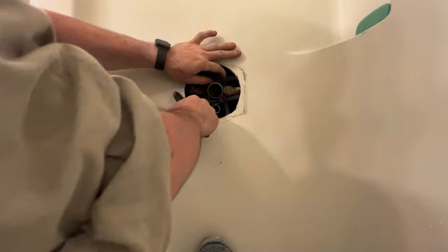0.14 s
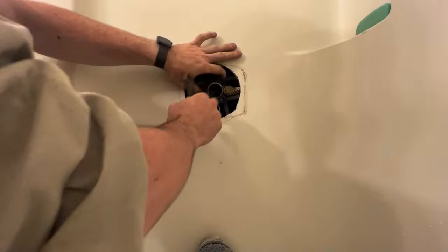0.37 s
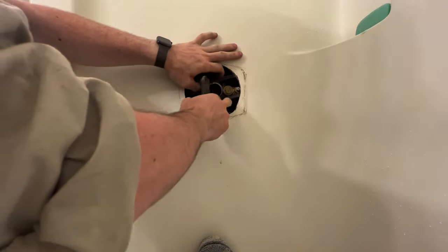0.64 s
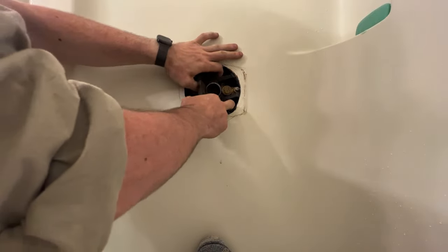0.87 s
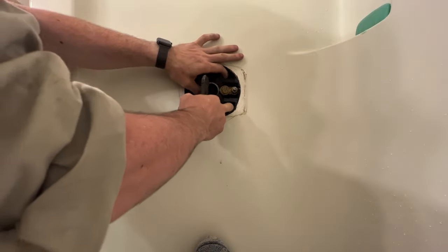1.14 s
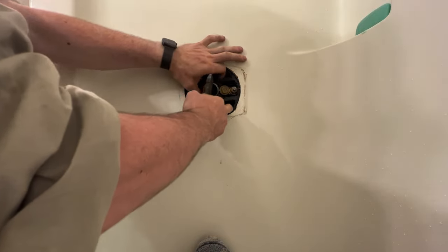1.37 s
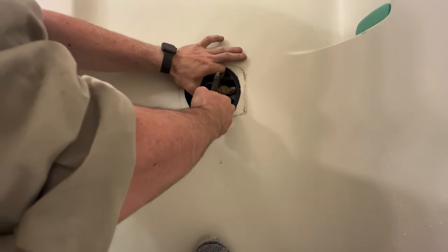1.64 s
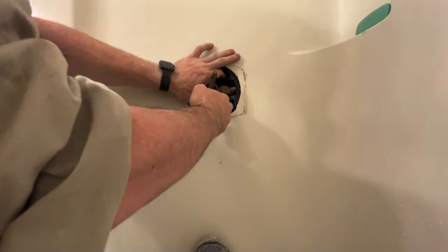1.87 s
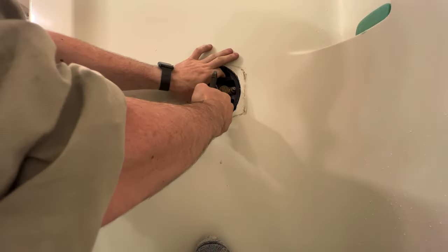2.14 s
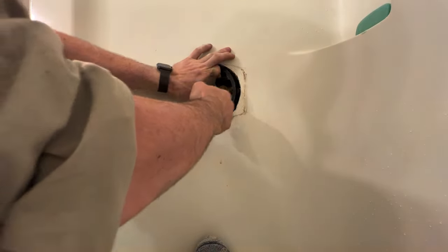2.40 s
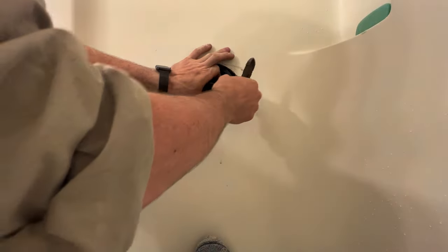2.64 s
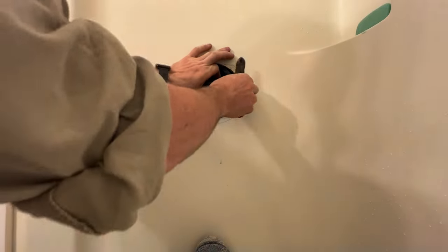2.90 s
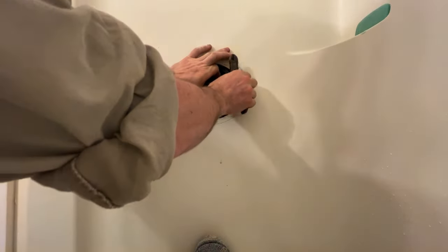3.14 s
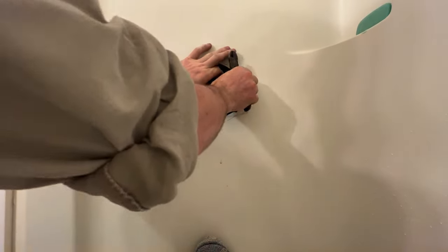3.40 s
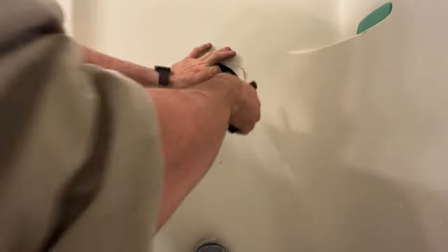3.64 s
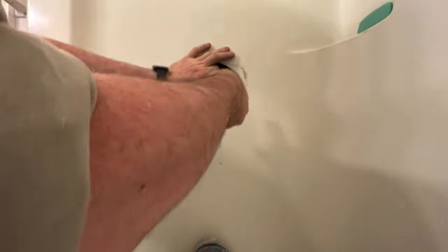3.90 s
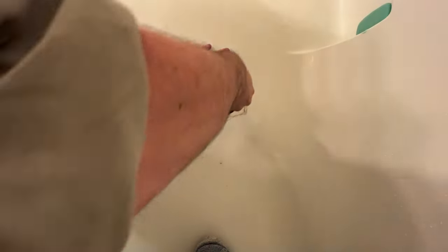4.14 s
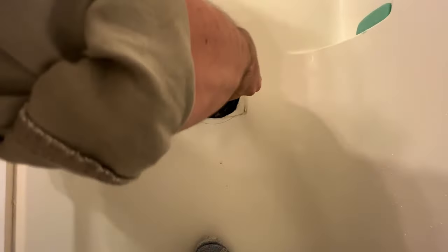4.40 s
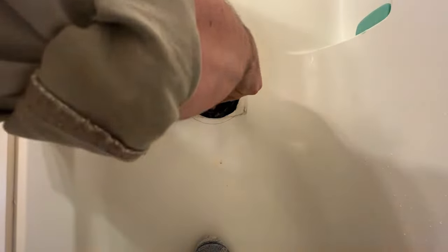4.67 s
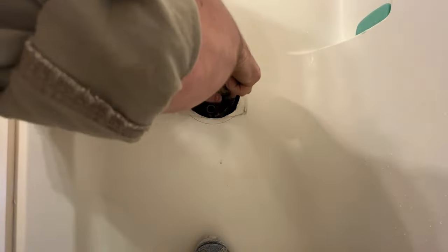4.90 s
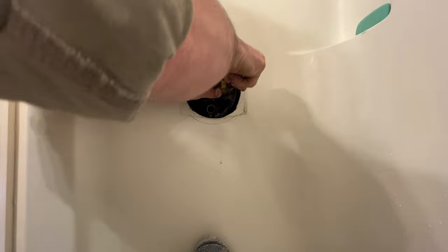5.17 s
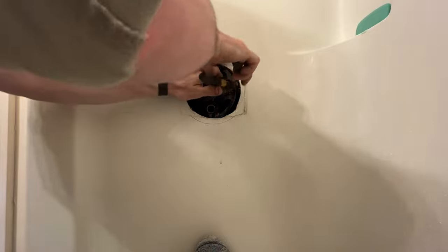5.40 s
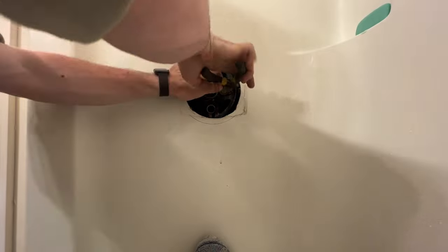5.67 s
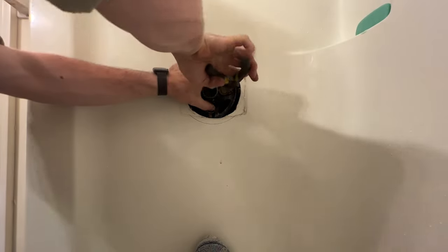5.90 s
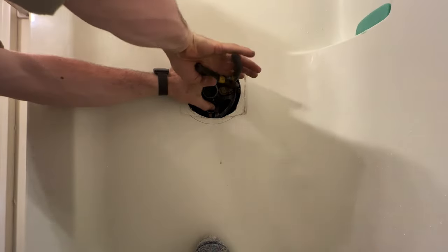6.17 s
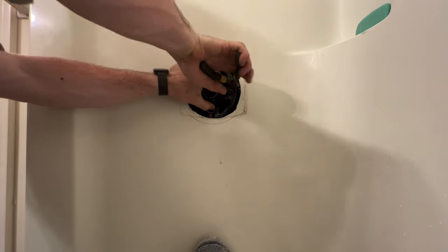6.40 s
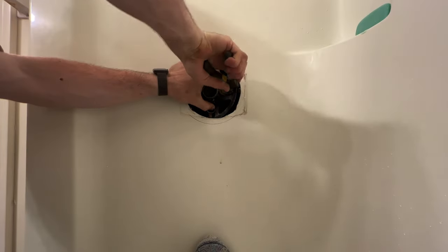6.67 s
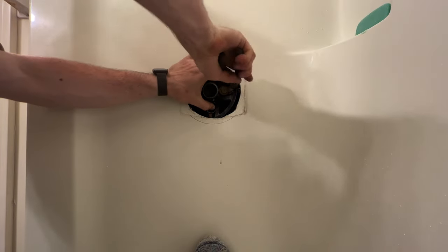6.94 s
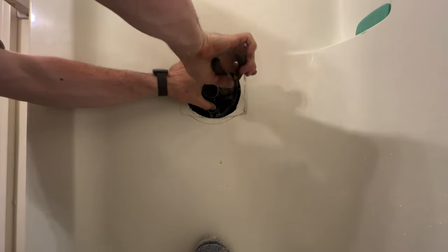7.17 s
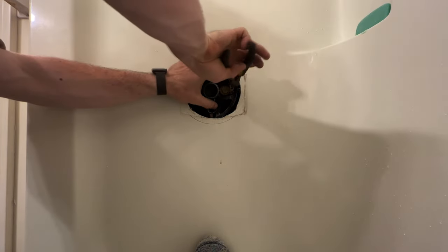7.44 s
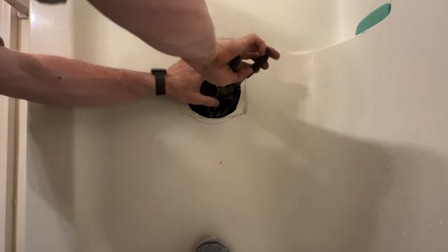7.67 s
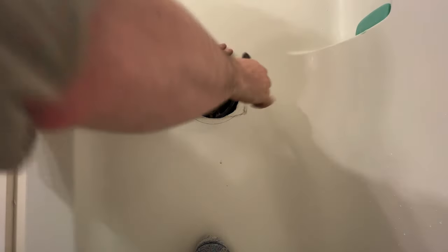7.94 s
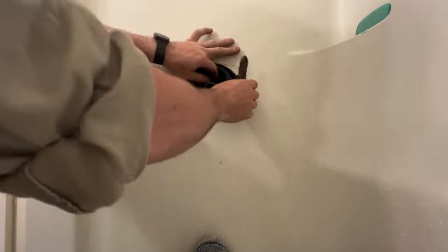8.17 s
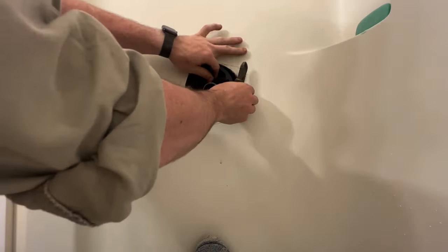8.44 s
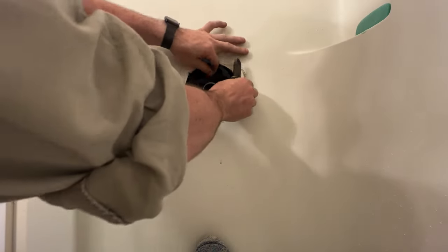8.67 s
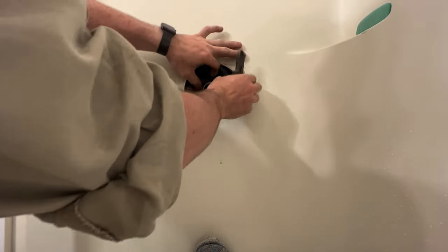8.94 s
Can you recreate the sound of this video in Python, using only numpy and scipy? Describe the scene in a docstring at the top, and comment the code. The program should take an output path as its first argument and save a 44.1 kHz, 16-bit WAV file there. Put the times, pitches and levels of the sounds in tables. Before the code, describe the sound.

Close-up in a small, hard bathroom, hands and pliers work at a valve in a hollow plastic shower surround. From 0 to 1.5 s irregular dull knocks and rubbing come thick and fast, growing denser after 0.85 s, with very faint metal scraping and small clicks. A heavy hollow thud lands at 1.7 s, then a tight burst at 2.3 s, boomy with a sharp metallic crack. From 2.8 to 4.3 s only soft taps and rubbing; muted bumps follow at 4.4, 4.6, 5.1 and 5.2 s, then near quiet. At 6.8 s comes the loudest blow, a hard double clack of steel and plastic with a short bright ring and boomy tail. A light knock at 7.2 s, a tiny wet squeak at 7.8 s, soft bumps, then medium knocks with faint clicks at 8.6 and 8.9 s. Low wall rumble swells irregularly beneath faint hiss and buzz.

```python
"""Pliers work on a valve set in the wall of a plastic shower surround, heard by a phone close by.
Knocks and rubbing ring the modes of the hollow shell and its dense boom; steel parts click and scrape
as noise bursts, short modes and wavering squeals, and the small hard room answers with decaying noise.
Under it the wall rumbles in low noise as the worker leans on it, and the microphone hisses and buzzes.
Late on, a finger squeaks on the wet plastic: noise ringing in a few panel modes."""
import sys
import numpy as np
from scipy import signal
from scipy.fft import rfft, irfft
from scipy.io import wavfile
from scipy.ndimage import uniform_filter1d

SR = 44100
rng = np.random.default_rng(int(sys.argv[2]) if len(sys.argv) > 2 else 0)


def transcribe(u):
    """Save the signal u as a 16-bit wav file named by the first command-line argument.

    u: samples, shape (n,) or (channels, n), limited to [-1, 1]; the rate is SR.
    q: integer samples, one column per channel.
    """
    v = np.clip(np.atleast_2d(u).T, -1, 1)
    q = np.round(v * 32767).astype(np.int16)
    wavfile.write(sys.argv[1], SR, q)


def natural_amplitude(level_db):
    """Convert a level in decibels to a linear amplitude factor, elementwise."""
    exponent = np.asarray(level_db, float) / 20
    return 10 ** exponent


N = 399546  # samples


def on_log(hz, table):
    """Read (Hz, value) rows on a log-frequency axis."""
    table_hz, value = np.transpose(table)
    return np.interp(np.log(np.maximum(hz, 1)), np.log(table_hz), value)


def unit(x):
    """Scale to rms 1."""
    return x / np.sqrt(np.mean(x ** 2))


def band(x, low_hz, high_hz):
    """Band-pass."""
    edges_hz = [low_hz, min(high_hz, 0.45 * SR)]
    return signal.sosfilt(signal.butter(2, edges_hz, "band", fs=SR, output="sos"), x)


def train(s, size):
    """Impulses of given size at given times."""
    x = np.zeros(N)
    at = np.clip((np.asarray(s) * SR).astype(int), 0, N - 1)
    np.add.at(x, at, size)
    return x


def fall(x, t60):
    """Each impulse becomes an exponential decay, down to a thousandth after t60 seconds."""
    return signal.lfilter([1], [1, -np.exp(-np.log(1000) / (t60 * SR))], x)


def ring(x, hz, t60):
    """One decaying mode; an impulse of 1 rings with amplitude 1."""
    radius = np.exp(-np.log(1000) / (t60 * SR))
    angle = 2 * np.pi * hz / SR
    return signal.lfilter([0, radius * np.sin(angle)], [1, -2 * radius * np.cos(angle), radius ** 2], x)


# How the small hard room and the shell die away at the microphone.
# Each row: pitch in Hz, decay time t60 in seconds.
RING_DOWN = [(40, 0.99), (110, 0.43), (280, 0.33), (740, 0.23), (1300, .21), (2200, 0.28), (5120, 0.22),
             (9000, .19), (14500, 0.15)]


def diffuse(power, hz, build_s):
    """Countless overlapping echoes in a third octave: they build up, then die at that band's rate."""
    # energy falls twice as fast as amplitude, hence half the t60
    energy = fall(power, on_log(hz, RING_DOWN) / 2) - fall(power, build_s)
    level = np.sqrt(np.maximum(energy, 0) * SR / hz)
    return band(level * rng.standard_normal(N), hz / 2 ** (1 / 6), hz * 2 ** (1 / 6))


def chatter(rate, spread_db, bump_db):
    """Stick-slip: random slips, rate per second, of unequal size that bunch into bumps; rms 1."""
    slips = (rng.random(N) < rate / SR) * natural_amplitude(spread_db * rng.exponential(size=N))
    bumps = natural_amplitude(bump_db * unit(band(rng.standard_normal(N), 7.04, 28)))
    return unit(slips * bumps * rng.standard_normal(N))


def strokes(s, length_s, attack_s, t60):
    """One envelope a row: swell, hold, exponential release."""
    since = np.arange(N) / SR - s[:, None]
    released = np.maximum(since - length_s[:, None], 0)
    return np.clip(since / attack_s, 0, 1) ** 2 * np.exp(-np.log(1000) * released / t60)


def after_blows(t60):
    """A level that jumps with every knock and dies away."""
    s, db = np.transpose(KNOCKS)[:2]
    return fall(train(s, natural_amplitude(db)), t60)


# The noise floor at the microphone, as a spectrum shape.
# Each row: pitch in Hz, relative level in dB per Hz.
HISS = [(26, -37), (45, 7), (73, -8), (103, -20.5), (195, -19.5), (437, -28), (712, -30.5), (932, -38),
        (1640, -44), (3490, -43.5), (9050, -46.5), (15500, -43.5)]
HISS_DB = -86  # rms of the hiss between 4.5 and 14 kHz


def hiss():
    """Steady air and microphone noise, with a faint electrical buzz: band-passed pulses at 240 Hz."""
    shape = natural_amplitude(on_log(np.fft.rfftfreq(N, 1 / SR), HISS))
    noise = irfft(rfft(rng.standard_normal(N)) * shape, N)
    noise = noise / np.std(band(noise, 4500, 14000))
    pulses = train(np.arange(0, N / SR, 1 / 240), 1.0)
    buzz = unit(band(pulses, 2300, 15000))
    return natural_amplitude(HISS_DB) * (noise + natural_amplitude(-1.5) * buzz)


# Weight leaning on the wall, between rows the level in dB moves in a straight line.
# Each row: time in seconds, level in dB.
LEAN = [(0.0, -59), (1.19, -44.5), (1.46, -59), (1.97, -37.5), (2.17, -60), (2.4, -34.5), (2.87, -63),
        (3.08, -44), (3.53, -47), (4.36, -64), (4.46, -44), (5.17, -55.5), (5.25, -45.5), (6.23, -58.5),
        (6.97, -41), (7.85, -57.5), (8.55, -47.5), (9.06, -61)]
SHAKE_DB, SHAKE_T60_S = -30.5, 0.41  # a blow shakes the wall too, relative to its own level


def rumble():
    """The wall flexes slowly under the leaning hand and shakes after blows: noise at 10 to 27 Hz."""
    low = unit(band(band(rng.standard_normal(N), 10, 27), 10, 27))
    lean_s, lean_db = np.transpose(LEAN)
    lean = natural_amplitude(np.interp(np.arange(N) / SR, lean_s, lean_db))
    shake = natural_amplitude(SHAKE_DB) * uniform_filter1d(after_blows(SHAKE_T60_S), size=800)
    return (lean + shake) * low


# Hands and tool rubbing the panel.
# Each row: start in seconds, length in seconds, pressure in dB, rasp in dB over pressure
# before RUB_LIFT_DB, thud in dB over pressure.
STROKES = [(0.077, 0.13, -54, -18, -4), (0.235, 0.13, -43, -14, -9), (0.58, 0.55, -54, -14, 5),
           (0.88, 0.067, -33, -20, -6), (1.05, 0.16, -39.5, -36, -11), (1.166, 0.073, -34.5, -22, -1),
           (1.387, 0.1, -48.5, -22, 5.5), (1.595, 0.21, -50.5, -23, 10.5), (2.507, 0.041, -75, -3.5, 6.5),
           (2.809, 0.23, -65, -24.5, 4), (2.978, 0.23, -62, -8, -4), (3.276, 0.24, -57.5, -5, 5.5),
           (4.068, 0.53, -67, -7, -21.5), (4.484, 0.2, -74.5, -5, -7), (5.044, 0.077, -66, -18.5, 17),
           (5.501, 0.15, -76.5, -14, 18), (6.109, 0.25, -64, -11.5, 0), (6.373, 0.19, -68.5, -3.5, -0.5),
           (7.163, 0.067, -50.5, -26, 4), (7.394, 0.25, -65.5, -15, 11), (7.707, 0.077, -47, -17, -1),
           (7.917, 0.091, -56.5, -21, 9), (8.05, 0.17, -53.5, -18.5, -8), (8.324, 0.17, -52, -18, -5),
           (8.475, 0.2, -60, -3, -13), (8.71, 0.17, -50, -18, 1), (8.939, 0.054, -36, -36, -43)]
STROKE_ATTACK_S, STROKE_T60_S = 0.035, 0.3
# the hand lying still: pressure, then rasp (before RUB_LIFT_DB) and thud over it
REST_DB, REST_RASP_DB, REST_THUD_DB = -77, -6.5, 3.5
# loose parts after a blow: amplitude relative to the blow, then each part's gain on it
RATTLE_DB, RATTLE_RASP_DB, RATTLE_THUD_DB, RATTLE_T60_S = -34, -6, 4.5, 0.54


def hands():
    """Thud, pressure and rasp in dB: strokes, the resting hand and the rattle after blows."""
    s, length_s, db, rasp_db, thud_db = np.transpose(STROKES)
    shape = strokes(s, length_s, STROKE_ATTACK_S, STROKE_T60_S)
    rattle = natural_amplitude(RATTLE_DB) * after_blows(RATTLE_T60_S)

    def total_db(over_db, rest_over_db, rattle_over_db):
        """Sum the three motions for one part of the rubbing."""
        rubbing = natural_amplitude(db + over_db) @ shape
        resting = natural_amplitude(REST_DB + rest_over_db)
        return 20 * np.log10(rubbing + resting + natural_amplitude(rattle_over_db) * rattle)

    thud = total_db(thud_db, REST_THUD_DB, RATTLE_THUD_DB)
    pressure = total_db(0, 0, 0)
    rasp = total_db(rasp_db, REST_RASP_DB, RATTLE_RASP_DB)
    return thud, pressure, rasp


# Knocks on the shell, close to the microphone.
# Each row: start in seconds, level in dB, bass in dB over level, upper range in dB over level
# before BLOW_LIFT_DB, strongest pitch in Hz.
KNOCKS = [(0.002, -31.5, 2, -17, 212), (0.184, -53, 15.5, -14, 257), (0.398, -39.5, -1, -29, 510),
          (0.425, -32, -8, -19, 277), (0.489, -49.5, 13.5, -9.5, 304), (0.678, -43, 5, -28, 272),
          (0.861, -34.5, -2, -14.5, 480), (0.931, -41, -1, -18, 398), (0.961, -36, 9, -15.5, 1220),
          (1.025, -30, -6.5, -19.5, 530), (1.068, -24.5, -8.5, -28.5, 116), (1.154, -31.5, -4, -25, 286),
          (1.206, -31, 3.5, -19, 308), (1.233, -28, -4.5, -19, 547), (1.38, -25.5, -2, -23, 136),
          (1.419, -29, -1.5, -21.5, 365), (1.454, -34.5, -1, -15, 410), (1.467, -24, -12.5, -22, 624),
          (1.7005, -14.5, -8, -15.5, 301), (2.2798, -34, 5, -15.5, 470), (2.313, -22, -11.5, -14, 504),
          (2.317, -22, -4, -13, 625), (2.3297, -12.5, -2.5, -9.5, 299), (2.35, -24.5, -3.5, -12, 164),
          (2.378, -24.5, -12, -12.5, 605), (2.789, -53.5, -5.5, -24, 266), (2.838, -49.5, -1, -13, 265),
          (2.992, -39.5, -12.5, -12, 492), (3.086, -47, -2.5, -49, 273), (3.309, -53, 5, -10, 273),
          (3.408, -52.5, -11, -8, 350), (3.55, -44.5, -15.5, -32, 435), (4.409, -36.5, 3.5, -14, 260),
          (4.474, -53.5, 10, -18, 200), (4.64, -40, 6.5, -13.5, 262), (4.704, -56, 9, -14, 218),
          (4.89, -55.5, 16, -15.5, 790), (5.085, -45, -37, -21, 281), (5.096, -28, -15, -19, 235),
          (5.18, -34, -6.5, -28, 237), (5.548, -50.5, -8.5, -28, 266), (5.861, -71.5, -16, -4.5, 1200),
          (6.416, -55, 13, -27, 238), (6.432, -67, -0.5, -1.5, 597), (6.56, -54.5, -27.5, -7, 244),
          (6.762, -62.5, 7.5, -4, 503), (6.813, -18.5, 1, -12.5, 187), (6.8465, -11, -7, -7.5, 464),
          (6.857, -15.5, -3, -29, 158.3), (7.175, -52, 21.5, -16, 130), (7.19, -34.5, -14.5, -21.5, 714),
          (7.895, -37.5, 6, -14, 294), (7.915, -35, -13, -19, 1670), (8.116, -38, 4.5, -10, 313),
          (8.276, -48.5, 3, -51, 270), (8.332, -53, -5, -10, 960), (8.602, -31.5, 5.5, -12, 685),
          (8.622, -41.5, -3, -8.5, 503), (8.652, -25.5, -2.5, -10, 198), (8.677, -27.5, -9, -25, 220),
          (8.808, -45, -2, -16, 270), (8.9325, -22, -5, -10, 552), (8.967, -36, -2, -27, 130)]
# Main modes of the hollow surround.
# Each row: pitch in Hz, relative level in dB, longest decay time t60 in seconds.
SHELL = [(46.4, -6, 0.22), (64.7, 5.5, 0.32), (134.6, 6, 0.12), (169.3, -2, 0.26), (201.7, -7, 0.49),
         (229.3, -6, 0.27), (272, -1, 0.31), (305.4, -4.5, 0.23), (333, -10.5, 0.087), (369.1, -8.5, 0.41),
         (446, -15.5, 0.23), (517, -12, 0.15), (544, -7.5, 0.7), (604, -10.5, 0.42), (723, -10.5, 0.2),
         (809.5, -14.5, .2), (850, -15, 0.091), (865, -21.5, 0.7), (963, -17.5, 0.21), (1075, -14.5, 0.12),
         (1170, -26.5, 0.049), (1495, -29.5, .18), (1661, -31.5, 0.27), (1800, -26.5, 0.33),
         (2340, -38, 0.2)]
# The dense boom of the surround.
# Each row: pitch in Hz, relative level in dB per Hz.
BOOM = [(35, -4.5), (65, -5.5), (130, 0), (230, -4.5), (300, -8.5), (450, -8), (750, -12), (1100, -16),
        (1330, -24.5), (1750, -29.5), (2330, -40.5), (2650, -43.5), (4000, -55.5)]
# added to the upper range of rubbing and of blows, in dB, growing from 350 Hz
RUB_LIFT_DB, BLOW_LIFT_DB = 8, 10.5
FAVOUR_DB = 10  # lift at a knock's strongest pitch
BUILD_S, BUILD_CYCLES = 0.005, 0.92  # the boom swells slower in the bass
# the direct push relative to a knock's upper level; hard blows push out of proportion
PUSH_DB, PUSH_GROWTH = 42, 1.35


def shell(thud_db, pressure_db, rasp_db):
    """Knocks and rubbing drive the modes of the hollow surround and its dense boom."""
    s, db, bass_db, upper_db, strongest_hz = np.transpose(KNOCKS)
    slips = chatter(2600, spread_db=3, bump_db=4.5)

    def drive(hz):
        """Strength of each blow and of the rubbing at one pitch."""
        # shares go from 0 at 350 Hz to 1 at 110 Hz and at 1100 Hz
        bass, upper = (np.clip(np.log(hz / 350) / np.log(edge_hz / 350), 0, 1) for edge_hz in (110, 1100))
        favour_db = FAVOUR_DB * np.exp(-(np.log2(hz / strongest_hz) / 0.18) ** 2)
        # above 1300 Hz the blows' upper slope steepens
        blow_upper = upper + 2.4 * max(np.log2(hz / 1300), 0)
        blow_db = db + bass * bass_db + blow_upper * (upper_db + BLOW_LIFT_DB) + favour_db
        rub_db = pressure_db + bass * (thud_db - pressure_db)
        rub_db = rub_db + upper * (rasp_db + RUB_LIFT_DB - pressure_db)
        return natural_amplitude(blow_db), natural_amplitude(rub_db) * slips

    # between the main modes the thin panel has many weaker ones, about evenly spaced
    fine_hz = 300 + np.cumsum(rng.uniform(12, 34, size=100))
    fine = [(hz, on_log(hz, BOOM) - 4, 0.92 * on_log(hz, RING_DOWN)) for hz in fine_hz]
    modes = list(SHELL) + fine
    # where a blow lands decides how much each mode takes, with which sign and how late
    share = rng.standard_normal((len(s), len(modes)))
    late_s = 0.0015 * rng.random((len(s), len(modes))) ** 2
    out = 0
    for k, (hz, mode_db, t60) in enumerate(modes):
        blows, rub = drive(hz)
        blows = blows * np.sign(share[:, k]) * natural_amplitude(2.83 * share[:, k])
        force = natural_amplitude(-14) * train(s + late_s[:, k], blows) + natural_amplitude(-38.5) * (-1) ** k * rub
        out = out + natural_amplitude(mode_db) * ring(force, hz, min(t60, 0.9 * on_log(hz, RING_DOWN)))
    # the boom, in third octaves
    for hz in 40 * 2 ** np.arange(0, 6.7, 1 / 3):
        blows, rub = drive(hz)
        power = train(s, blows ** 2) + (natural_amplitude(-34.5) * rub) ** 2
        boom = diffuse(power, hz, BUILD_S + BUILD_CYCLES / hz)
        out = out + natural_amplitude(on_log(hz, BOOM) - 35.5) * np.sqrt(hz) * boom
    # the blow itself is a short push without delay
    push = train(s, natural_amplitude(PUSH_GROWTH * db + upper_db))
    out = out + natural_amplitude(PUSH_DB) * band(band(push, 90, 1100), 90, 1100)
    # plastic and skin are soft, so no sharp edge gets through
    return signal.sosfilt(signal.butter(6, 2700, fs=SR, output="sos"), out)


# The tool scraping metal.
# Each row: start in seconds, length in seconds, level in dB, squeal in dB over level.
SCRAPES = [(0.3, 0.046, -87, -23), (0.853, .02, -88.5, -3), (0.936, 0.025, -83.5, -13),
           (1.03, 0.031, -95, 7), (1.088, .02, -98, 6), (1.153, .01, -83.5, -22), (1.193, 0.035, -86, -10),
           (1.382, 0.031, -82, -13), (1.454, 0.017, -90, -14)]
SCRAPE_ATTACK_S, SCRAPE_T60_S = 0.0072, 0.12
# The jaws sing at these pitches when they slip.
# Each row: mean pitch in Hz, relative level in dB.
SQUEALS = [(5850, 2.5), (7750, 0.5), (8300, -11), (11200, -3)]
SQUEAL_WAVER = 0.015  # rms, share of the pitch
# Clicks of steel on brass.
# Each row: start in seconds, level in dB, ring in dB, brightest pitch in Hz.
CLICKS = [(1.234, -68, -12, 3520), (1.3724, -56, -16, 3820), (1.386, -58, -16, 3900),
          (1.461, -55, -8.5, 3600), (1.7, -47, -26, 2740), (2.308, -63, -8, 5800), (2.318, -34, -31, 9200),
          (2.33, -32.5, -9, 5400), (6.814, -35.5, -10, 6570), (6.8432, -24, -9, 7900),
          (7.9146, -61, -9, 4730), (8.119, -61, -8, 2870), (8.606, -55, -25, 2900), (8.622, -77, -10, 2470),
          (8.6526, -45.5, -14, 2770), (8.9328, -47.5, -18, 2700)]
# Ringing modes of the tool and the valve.
# Each row: pitch in Hz, relative level in dB, decay time t60 in seconds.
STEEL = [(1760, 5.5, 0.06), (1945, 6, 0.26), (2268, 2.5, 0.12), (2510, -1.5, .1), (2870, 1, 0.12),
         (4340, -2.5, 0.039), (4820, -4, 0.052), (6400, -5, 0.048), (7000, -2, 0.052), (7600, -4.5, 0.021),
         (8650, 1.5, 0.03), (10750, -3.5, 0.014)]
# The room's bright answer to the metal.
# Each row: pitch in Hz, relative level in dB per Hz.
CLICK = [(1470, -19.5), (2500, -1), (3550, -4), (4400, -6), (6300, -3), (6950, -15.5), (8480, -7),
         (12000, -11.5), (15500, -19.5)]


def steel():
    """Sharp clicks, a short ring of tool and valve, scraping, and the room's bright answer."""
    s, db, ring_db, bright_hz = np.transpose(CLICKS)
    start_s, length_s, scrape_db, squeal_db = np.transpose(SCRAPES)
    shape = strokes(start_s, length_s, SCRAPE_ATTACK_S, SCRAPE_T60_S)
    grit = chatter(2500, spread_db=3.5, bump_db=3)
    scrape = natural_amplitude(scrape_db) @ shape * grit
    squeal = natural_amplitude(scrape_db + squeal_db) @ shape * grit

    def near(hz, db_per_octave):
        """Each contact favours the pitches near its brightest one."""
        return natural_amplitude(db - db_per_octave * np.abs(np.log2(hz / bright_hz)))

    # the contact crackles for a few milliseconds
    crackle = rng.standard_normal(N)
    out = 0
    for hz, crack_db in [(2800, 11.5), (4500, 6.5), (8500, 0.5), (13500, -7)]:
        burst = fall(train(s, near(hz, 4.2)), 0.0024) * crackle
        out = out + natural_amplitude(crack_db) * band(burst, hz / 1.4, hz * 1.4)
    for hz, mode_db, t60 in STEEL:
        out = out + natural_amplitude(mode_db) * ring(train(s, natural_amplitude(ring_db) * near(hz, 13)), hz, t60)
    # the changing grip bends the squeals' pitch
    bend = 1 + SQUEAL_WAVER * unit(band(rng.standard_normal(N), 4, 18))
    for hz, mode_db in SQUEALS:
        # a resonator whose pitch moves: decay in a frame that turns with the bent pitch
        turn = np.exp(2j * np.pi * np.cumsum(hz * bend) / SR)
        out = out + (turn * fall(natural_amplitude(mode_db - 11) * squeal / turn, 0.025)).imag
    # the room's answer, in third octaves
    for hz in 2000 * 2 ** np.arange(0, 3.1, 1 / 3):
        power = train(s, near(hz, 3.5) ** 2) + (natural_amplitude(-5.5) * scrape) ** 2
        out = out + natural_amplitude(on_log(hz, CLICK) - 53) * np.sqrt(hz) * diffuse(power, hz, 0.0023)
    return out


# A finger squeaking on the wet plastic.
# One row: start in seconds, level of the driving noise in dB, length in seconds.
SQUEAK = (7.77, -83, 0.086)
# Panel modes that sing in the squeak.
# Each row: pitch in Hz, relative level in dB.
SQUEAK_MODES = [(560, 3.5), (760, -16), (990, 4), (1500, -16.5)]


def squeak():
    """Skin slips for a moment and sings in a few panel modes."""
    s, db, length_s = SQUEAK
    swell = np.sin(np.pi * np.clip((np.arange(N) / SR - s) / length_s, 0, 1)) ** 2
    out = 0
    for hz, mode_db in SQUEAK_MODES:
        out = out + ring(natural_amplitude(db + mode_db) * swell * rng.standard_normal(N), hz, 0.043)
    return out


def scene():
    """All sources at one microphone."""
    mix = hiss() + rumble() + shell(*hands()) + steel() + squeak()
    return mix[None]


def top_cut(x):
    """Nothing passes above the cut-off."""
    return signal.sosfilt(signal.butter(12, 15710, fs=SR, output="sos"), x)


def record(dry):
    """The phone close by keeps the finished mix."""
    return top_cut(dry)


dry = scene()
out = record(dry)
transcribe(out)
```